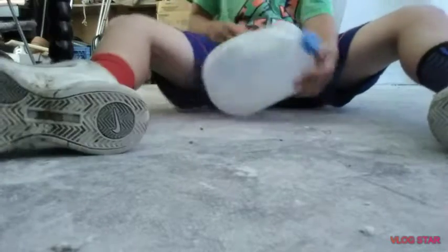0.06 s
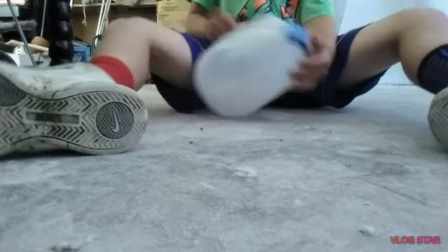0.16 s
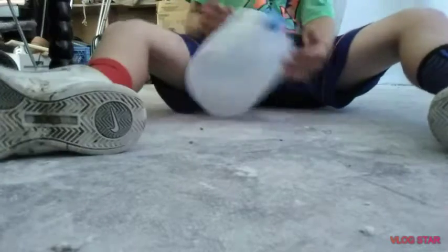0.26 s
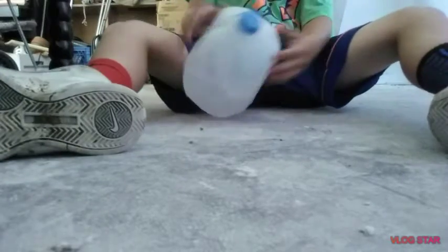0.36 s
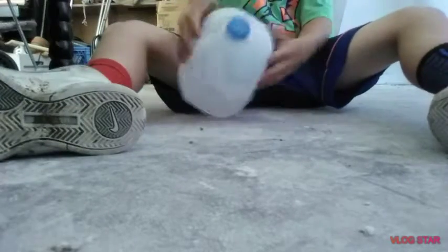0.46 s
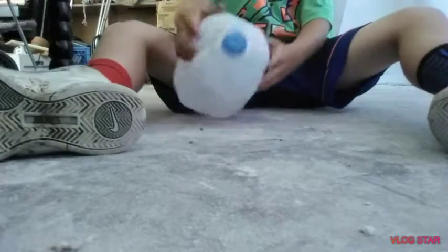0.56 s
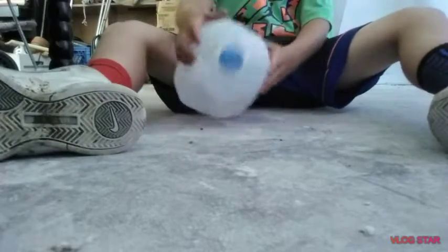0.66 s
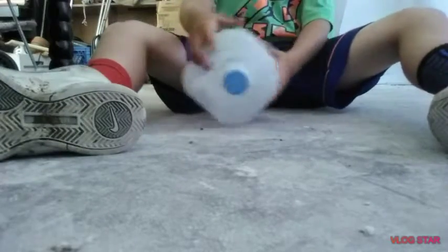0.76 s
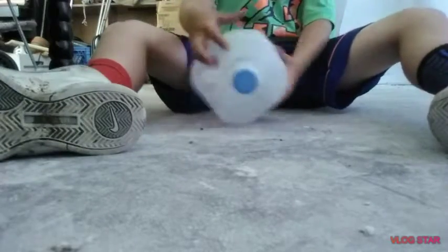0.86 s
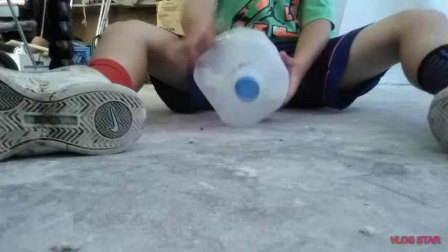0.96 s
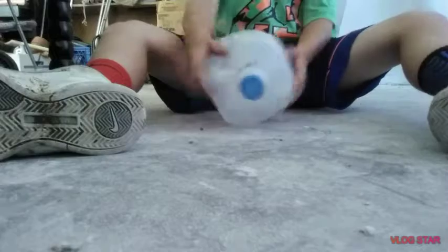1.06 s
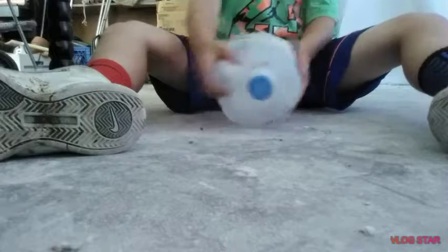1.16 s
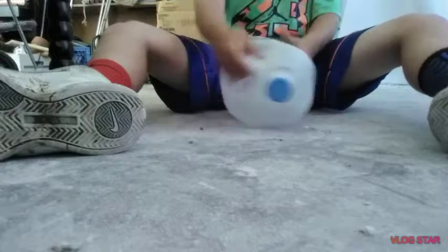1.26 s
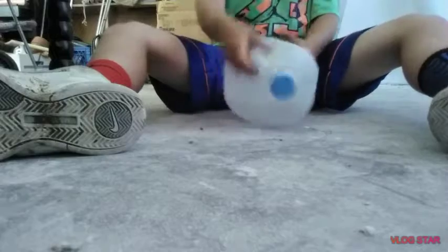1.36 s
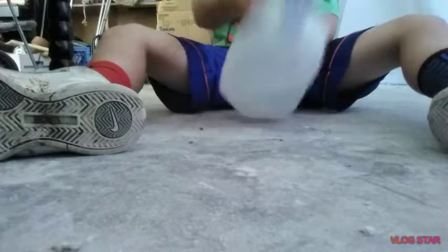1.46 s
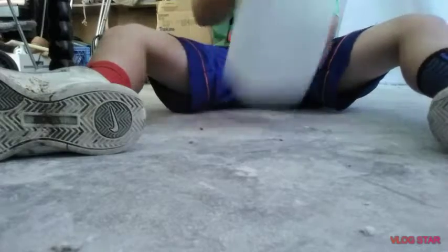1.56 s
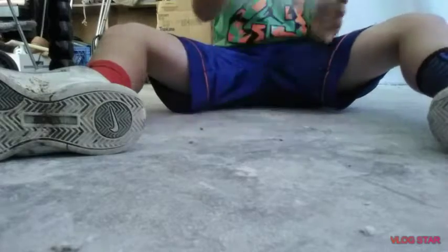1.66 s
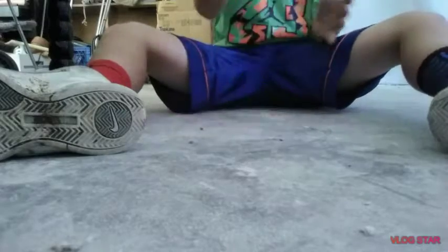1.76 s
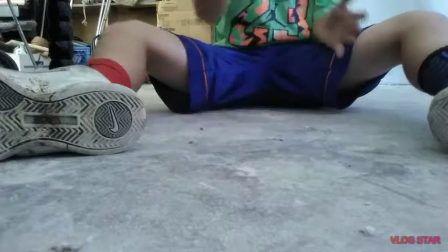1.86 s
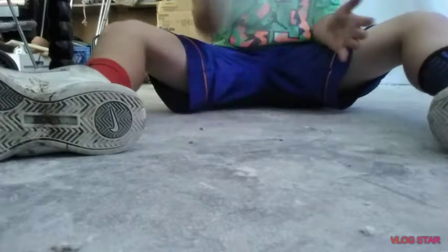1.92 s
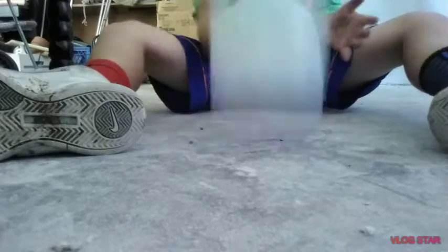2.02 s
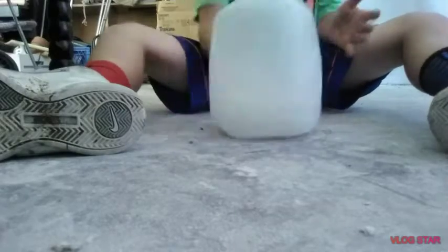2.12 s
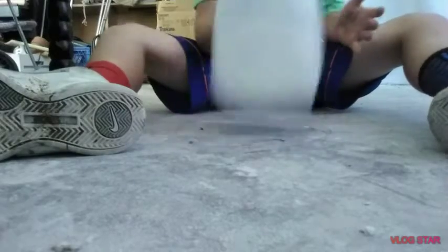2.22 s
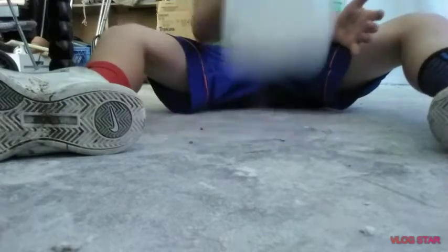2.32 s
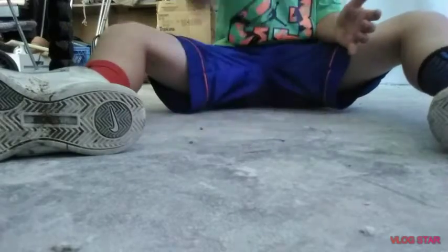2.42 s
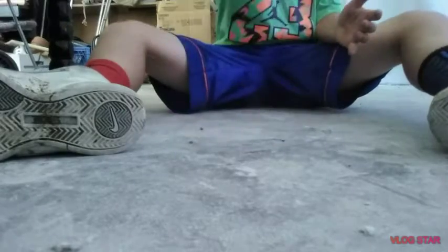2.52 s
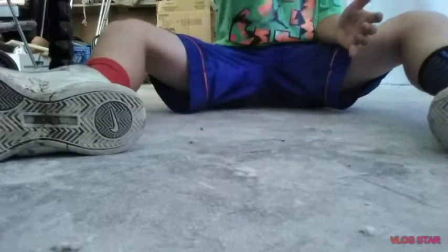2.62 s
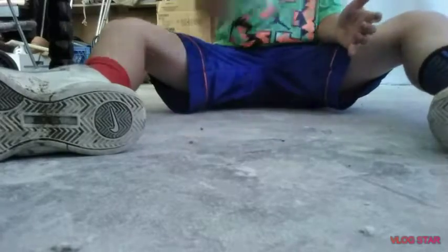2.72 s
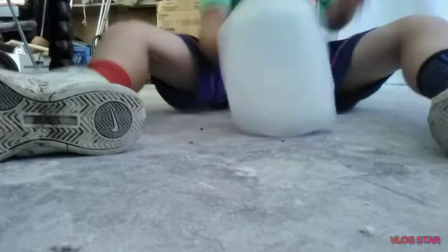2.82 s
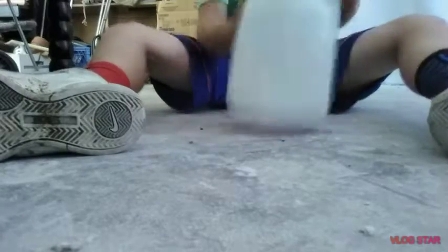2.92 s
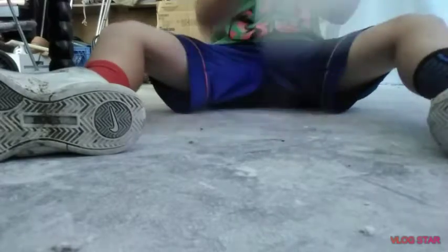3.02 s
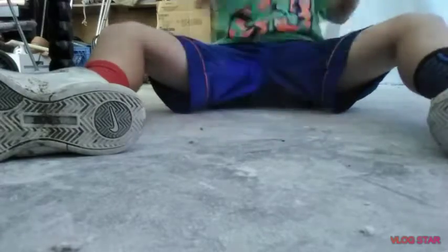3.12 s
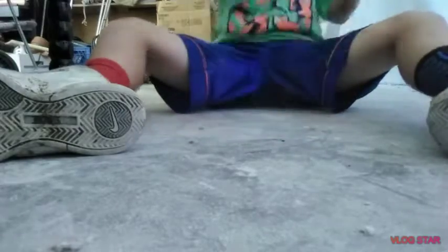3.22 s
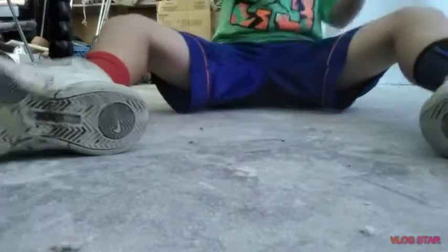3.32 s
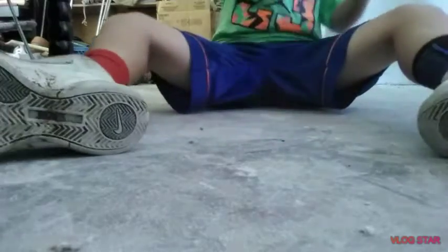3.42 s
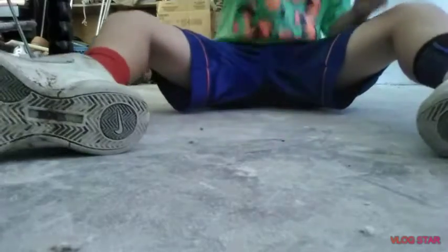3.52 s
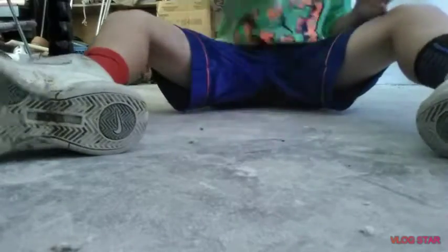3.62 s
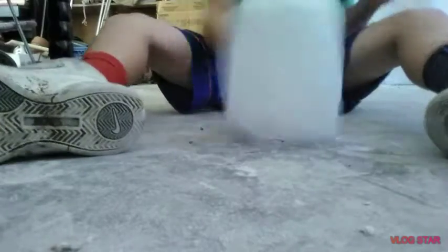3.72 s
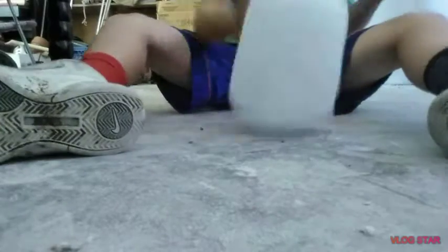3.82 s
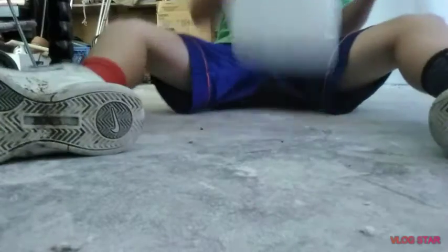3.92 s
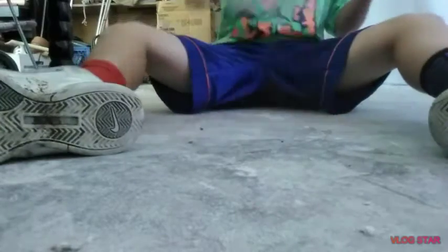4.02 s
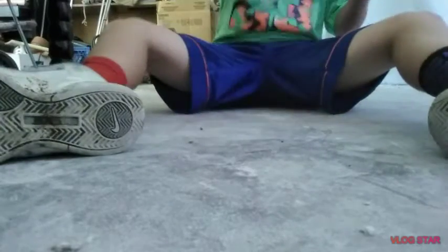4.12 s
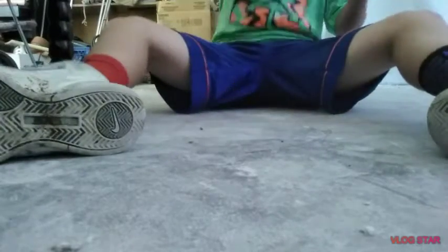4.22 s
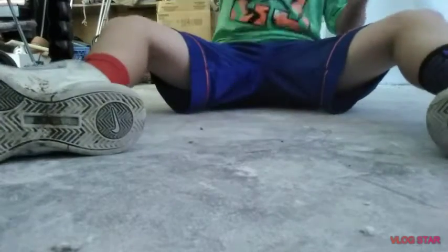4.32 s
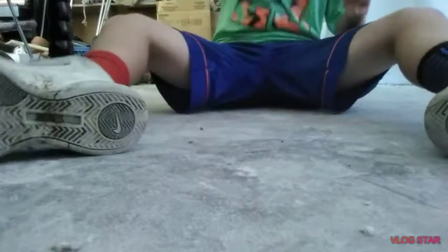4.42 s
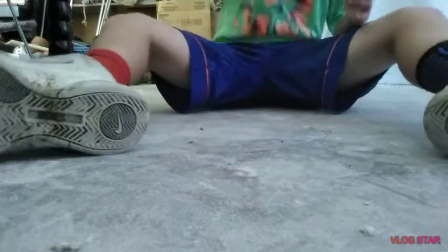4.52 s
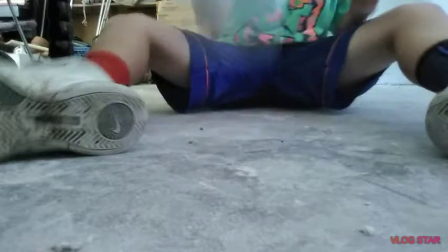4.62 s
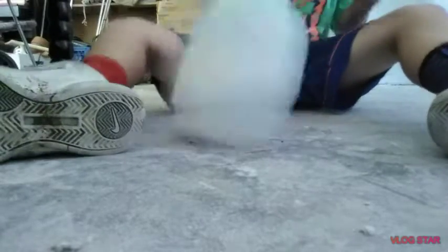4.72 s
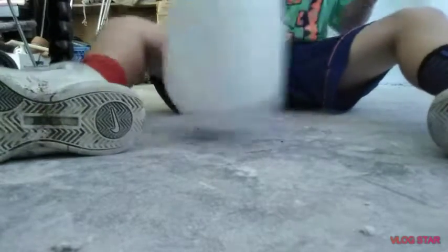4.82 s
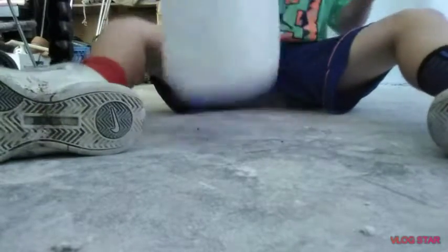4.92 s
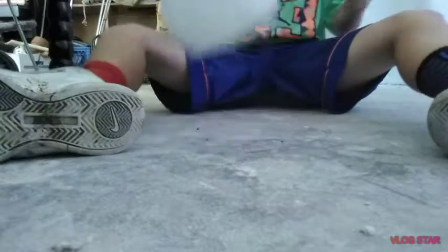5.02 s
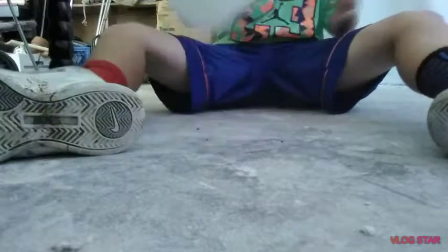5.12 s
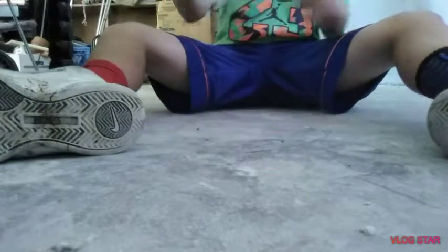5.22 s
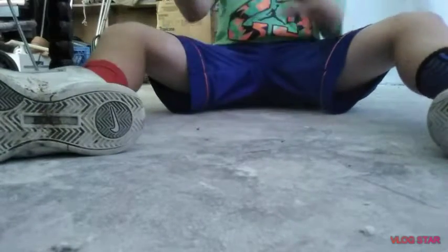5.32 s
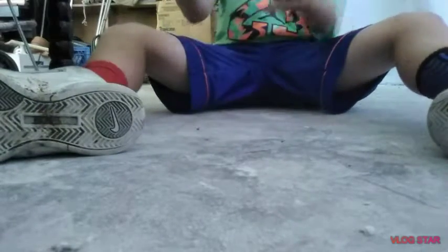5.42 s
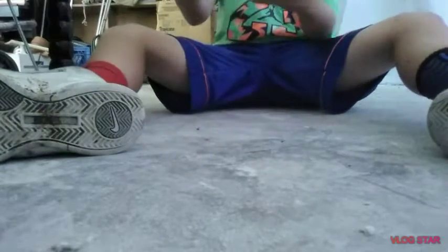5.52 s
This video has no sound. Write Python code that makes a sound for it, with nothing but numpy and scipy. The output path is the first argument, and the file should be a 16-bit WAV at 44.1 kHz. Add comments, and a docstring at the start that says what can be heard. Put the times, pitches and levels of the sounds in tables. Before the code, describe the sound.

A plastic jug with a little water is handled quietly, then smacks hard onto concrete four times, ringing hollow in a garage.

```python
"""On a concrete garage floor, close microphone: a plastic jug with a little water in it is turned in the
hands, then swung down four times. Each landing cracks (noise bursts), rings jug and garage (decaying sines)
and sets the base booming; the garage answers with fading noise and the close microphone overloads. Water
swishes as grainy noise and plops as rising sines, and like sounds lead softly into some landings;
skin brushes the plastic over a faint electric hum."""
import sys
import numpy as np
from scipy import signal
from scipy.fft import rfft, irfft, next_fast_len
from scipy.io import wavfile
from scipy.ndimage import uniform_filter1d

SR = 44100
rng = np.random.default_rng(int(sys.argv[2]) if len(sys.argv) > 2 else 0)


def master_out(mix):
    """Clip the mix to full scale and print it as 16-bit PCM to the path in sys.argv[1]."""
    frames = np.transpose(np.atleast_2d(mix))
    ceiling = np.clip(frames, -1, 1)
    pcm = np.round(ceiling * 32767).astype(np.int16)
    wavfile.write(sys.argv[1], SR, pcm)


N = 245637  # samples

# Levels are relative within each layer; spectra are relative density, brought to rms 1 by noise().
# Jug landings: t/s, smack level/dB, treble tilt/dB, ringing level/dB, ringing tilt/(dB per octave),
# boom level/dB, delay until the jug lifts/s, edge f/Hz, edge level/dB, knock f/Hz, knock level/dB,
# delay until the water lands/s, water level/dB
JUG_LANDINGS = [(2.078, -2.5, 0, -8, 1, -21.5, .155, 743, -11, 349.3, -12.5, .066, -19.5),
                (2.835, -3.5, -3, -5.5, 1.5, -13.5, .16, 735, -7.5, 402.2, -16.5, .075, -16.5),
                (3.7294, 2, -1.5, -3, -0.5, -7.5, 0.16, 559, -9, 501, -14, .075, -25.5),
                (4.741, -1.5, -4.5, -2, 0, -20, 0.14, 431, -11, 312.4, -11.5, 0.066, -11.5)]
# Ringing modes of the jug and the garage: f/Hz, level/dB, t60/s (before any damping by the hand)
RINGING_MODES = [(97.6, -14.5, .3), (132.6, -18.5, 0.23), (196, -27, 0.41), (233.6, -17, 0.21),
                 (282.7, -16, 0.27), (333.3, -23, 0.31), (401.8, -22.5, 0.19), (484.3, -16.5, 0.4),
                 (597.4, -23, 0.45), (617, -20, 0.45), (743.3, -22, 0.48), (832, -24, 0.11),
                 (1014, -24.5, 0.51), (1237, -26, 0.08), (1265, -25, 0.43), (1364, -21, 0.42),
                 (1467, -21, 0.32), (1561, -25.5, 0.47), (1815, -25, 0.53), (2080, -30.5, 0.33),
                 (2148, -34, 0.67)]
# Colour of the crack and of its echo, before the treble tilt: f/Hz, level/dB
SMACK_COLOUR = [(60, -15.5), (200, -4.5), (400, 6), (750, 4), (1100, -1.5), (1800, 1), (3200, -2),
                (5000, -2), (7400, 0.5), (8600, -9.5), (10000, -19.5), (15000, -42)]
# Push of air under the base: f/Hz, level/dB
THUD_COLOUR = [(20, -16.5), (42, -4.5), (65, 0.5), (140, -4.5), (260, -26), (600, -70)]
# Decay of the garage: f/Hz, t60/s
GARAGE_DECAY = [(60, 0.22), (200, 0.16), (450, 0.35), (1100, 0.44), (2500, 0.47), (7500, 0.44),
                (14000, 0.6)]
# Water sliding along the walls when the jug is swung or tipped: t/s, level/dB at t, swell length/s
WATER_SWISHES = [(1.115, -64, 0.11), (2.036, -45.5, 0.035), (2.775, -41, 0.084), (3.586, -48.5, .13),
                 (3.998, -51, 0.071), (4.5, -55.5, 0.25)]
# Colour of the tiny splashes: f/Hz, level/dB
SPRAY_COLOUR = [(240, -32.5), (400, -12.5), (502, 0.5), (640, -5.5), (1010, -5), (1250, -9), (2220, -3.5),
                (3770, -5.5), (4260, -6), (6710, -1.5), (7580, -2.5), (15000, -35)]
# Water plops; the rows at 2.066, 3.717 and 4.729 s are short soft low-mid lead-ins just before a landing:
# t/s, sine level/dB, starting f/Hz
PLOPS_AND_LEAD_INS = [(.005, -38, 423), (.479, -48, 760), (.548, -43.5, 660), (1.305, -48.5, 1000),
                      (1.415, -43.5, 667), (1.438, -36, 680), (1.461, -40, 712), (1.646, -30, 919),
                      (2.066, -33.5, 728), (2.702, -44.5, 800), (3.68, -34, 480), (3.717, -30.5, 780),
                      (4.041, -46, 873), (4.654, -42.5, 840), (4.729, -22, 450), (4.977, -46, 516)]
# Fingers brushing the plastic, and at 0.787 s a short grainy burst near 1 kHz: t/s, level/dB, stroke length/s,
# centre f/Hz, skin hiss level/dB
FINGER_BRUSHES = [(.003, -49.5, 0.038, 2000, 1), (.546, -49.5, 0.019, 1940, 1),
                  (.772, -54, 0.056, 3300, -9), (0.787, -53, 0.026, 1060, -18),
                  (1.019, -59, 0.033, 2430, -18), (1.437, -54.5, 0.043, 1800, -1),
                  (1.578, -58.5, 0.059, 1500, -18), (2.70, -52.5, .022, 1840, -19.5),
                  (3.579, -48, .06, 2220, -10.5), (4.668, -40, .014, 2300, -10),
                  (5.11, -58, 0.042, 3900, -16.5)]
# Hiss of skin on plastic: f/Hz, level/dB
SKIN_COLOUR = [(400, -45), (3200, -8.5), (6400, -3), (7400, -4), (9600, -19), (15000, -38)]
# The jug jolts in the hand on the downswing: t/s, level/dB
HAND_JOLTS = [(2.005, -33.5), (4.668, -23)]
# Partials of the electric hum, before the common trim: f/Hz, rms level/dB
HUM_PARTIALS = [(59.2, -62.5), (96.5, -63.5), (118.6, -61.5), (243.4, -60), (343, -72), (400, -77),
                (487, -80)]
# Colour of the still air: f/Hz, level/dB
AIR_COLOUR = [(22, -34.5), (45, -8.5), (120, -8.5), (200, -10), (300, -14), (450, -16), (900, -23),
              (1400, -22.5), (2300, -24), (3400, -27.5), (4600, -24), (7500, -20.5), (10000, -32),
              (15000, -49.5)]

BOOM_HZ = 73  # the base on its cushion of air
# the water breaks loose, gathers speed, settles
SWISH_RISE_DB_PER_S, SWISH_SWELL_DB_PER_S, SWISH_FALL_DB_PER_S = 650, 58.5, 191.5
WHINE_HZ, WHINE_DB = 4550, -75.5  # a thin whine above the hum
TOP_HZ = 15600  # upper band limit of the recorder


def amp(db):
    """Decibels to amplitude."""
    return 10 ** (np.asarray(db) / 20)


def unit(x):
    """Scale to rms 1."""
    return x / np.sqrt(np.mean(x ** 2) + 1e-20)


def along(points, hz):
    """Read (f/Hz, value) points on a log frequency axis."""
    f, value = np.transpose(points)
    return np.interp(np.log(hz + 1), np.log(f + 1), value)


def filtered(x, response):
    """Multiply the spectrum of x by a response of frequency."""
    size = next_fast_len(len(x) + 8192)
    hz = np.fft.rfftfreq(size, 1 / SR)
    return irfft(rfft(x, size) * response(hz), size)[:len(x)]


def noise(spectrum, size):
    """Coloured noise of rms 1."""
    return unit(filtered(rng.standard_normal(size), lambda hz: amp(along(spectrum, hz))))


def flutter(size, width):
    """Slow random wander of rms 1: white noise averaged over width samples."""
    return unit(uniform_filter1d(rng.standard_normal(size), size=width))


def add(track, s, sound):
    """Mix a sound in at time s."""
    part = track[max(round(s * SR), 0):][:len(sound)]
    part += sound[:len(part)]


def landings():
    """Smack, hollow pock of the first edge, ringing, panel knock and boom; the water comes down just after."""
    out, t = np.zeros(N), np.arange(SR) / SR
    for (s, smack_db, treble_db, ringing_db, tilt_db, boom_db, lift, edge_hz, edge_db,
         knock_hz, knock_db, water_lag, water_db) in JUG_LANDINGS:
        hit = amp(smack_db) * smack(t, treble_db, crack_db=-6.0, crack_t60=0.013,
                                    echo_db=-10.5, echo_rise=0.023)
        edge = amp(edge_db) * ring(t, edge_hz, 0.075, rough=24, rise=0.0032)
        ringing = amp(ringing_db) * struck_modes(t, tilt_db)
        knock = amp(knock_db) * ring(t, knock_hz, 0.3, rough=14, rise=0.014)
        boom = amp(boom_db) * ring(t, BOOM_HZ, 0.46, rough=1.8, rise=0.022)
        thud = amp(-21.5) * noise(THUD_COLOUR, len(t)) * amp(-60 * t / 0.36)
        choke = .5 - .5 * np.tanh((t - lift) / 0.011)  # the base stops booming once it leaves the floor
        add(out, s, hit + edge + ringing + knock + (boom + thud) * choke)
        water = amp(water_db) * ring(t, knock_hz, .16, rough=26, rise=0.0064)
        add(out, s + water_lag, water)
    return out


def smack(t, treble_db, crack_db, crack_t60, echo_db, echo_rise):
    """One edge cracks on the concrete, the rest of the base slaps after it, and the echo builds up."""
    tilt = [(1800, 0), (4500, 1)]  # treble setting takes hold between these f/Hz
    colour = [(hz, db + treble_db * along(tilt, hz)) for hz, db in SMACK_COLOUR]
    contact = amp(-60 * t / crack_t60)
    for delay, db in [(.003, 5.5), (.011, -4.5)]:  # later slaps: delay/s, level/dB
        contact = contact + (t > delay) * amp(db - 60 * np.abs(t - delay) / crack_t60)
    crack = amp(crack_db) * contact * noise(colour, len(t))
    rattle = amp(0.95 * flutter(len(t), width=300))  # the thin walls flutter
    echo = dying(noise(colour, len(t))) * rattle * (1 - np.exp(-t / echo_rise))
    return crack + amp(echo_db) * echo


def struck_modes(t, tilt_db):
    """Jug and garage ring at new strengths on every blow; random phase drift broadens the higher modes most."""
    out = np.zeros(len(t))
    for hz, db, t60 in RINGING_MODES:
        mode_db = db + tilt_db * np.log2(hz / 500) + rng.normal(0, 2)
        strength = rng.choice([-1, 1]) * amp(mode_db)
        out += strength * ring(t, hz, t60, rough=3.5 + hz / 130, rise=.009)
    return out


def ring(t, hz, t60, rough, rise):
    """One decaying sine with a random phase drift."""
    drift = np.cumsum(rng.standard_normal(len(t))) / np.sqrt(SR)
    return np.sin(2 * np.pi * hz * t + rough * drift) * amp(-60 * t / t60) * (1 - np.exp(-t / rise))


def dying(x):
    """Each frequency of x fades at the pace of the garage."""
    hz, t, z = signal.stft(x, SR, nperseg=256)
    fade = amp(-60 * t / along(GARAGE_DECAY, hz)[:, None])
    return signal.istft(z * fade, SR, nperseg=256)[1][:len(x)]


def in_garage(x, wet_db):
    """A sound with its diffuse echo off the garage."""
    tail = dying(rng.standard_normal(SR))
    echo = signal.fftconvolve(x, tail / np.linalg.norm(tail))[:len(x)]
    return x + amp(wet_db) * echo


def swish(grain_db, wet_db):
    """A film of water rushes along the inside in tiny splashes: starts quickly, swells, then settles."""
    level = np.zeros(N)
    for s, db, length in WATER_SWISHES:
        t = np.arange(N) / SR - s
        rise = SWISH_RISE_DB_PER_S * np.minimum(t, 0)
        swell = SWISH_SWELL_DB_PER_S * np.clip(t, 0, length)
        fall = SWISH_FALL_DB_PER_S * np.maximum(t - length, 0)
        level += amp(db + rise + swell - fall)
    splashes = amp(grain_db * flutter(N, width=130))
    return level * unit(in_garage(splashes * noise(SPRAY_COLOUR, N), wet_db))


def plops_and_lead_ins(t60, rise, splash_db, splash_t60, wet_db):
    """A brief rising sine under slightly higher noise: trapped air and closing water, or a soft lead-in."""
    out, t = np.zeros(N), np.arange(SR // 2) / SR
    for s, db, hz in PLOPS_AND_LEAD_INS:
        tone = amp(-60 * t / t60) * np.sin(2 * np.pi * hz * t * (1 + rise * t))
        splash = unit(filtered(rng.standard_normal(len(t)),
                               lambda f: np.exp(-(np.log2((f + 1) / (1.2 * hz)) / .55) ** 2)))
        splash = amp(splash_db - 60 * t / splash_t60) * splash
        sound = (tone + splash) * (1 - np.exp(-t / .0012))
        add(out, s, amp(db) * in_garage(sound, wet_db))
    return out


def brushes(wet_db):
    """Short grainy rubs of skin on plastic, and one grainy burst near 1 kHz; the longer ones swell more slowly."""
    out, t = np.zeros(N), np.arange(SR // 2) / SR
    for s, db, length, hz, hiss_db in FINGER_BRUSHES:
        rub = noise([(hz / 16, -45), (hz / 2, -11), (hz, 0), (hz * 1.15, -3),
                     (hz * 1.5, -19), (hz * 5, -45)], len(t))
        hiss = amp(hiss_db) * noise(SKIN_COLOUR, len(t))
        grains = unit(amp(4 * flutter(len(t), width=130)))
        stroke = np.exp(-(t / length) ** 2) * (1 - np.exp(-t / (0.35 * length)))
        add(out, s, amp(db) * (rub + hiss) * grains * stroke)
    return in_garage(out, wet_db)


def jolts(centre_hz, t60):
    """The soft hand rings mainly the low modes, and damps them."""
    out, t = np.zeros(N), np.arange(SR // 2) / SR
    for s, db in HAND_JOLTS:
        add(out, s, amp(db) * struck_modes(t, tilt_db=0) * amp(-60 * t / t60))
    band = [(centre_hz / 2, -12), (centre_hz, 0), (centre_hz * 2, -12), (centre_hz * 5, -40)]
    return filtered(out, lambda hz: amp(along(band, hz)))


def background(hum_db, air_db):
    """A faint electric hum of steady sines and a narrow noise whine in still air."""
    t = np.arange(N) / SR
    hum = sum(np.sqrt(2) * amp(db) * np.sin(2 * np.pi * (hz * t + rng.random()))
              for hz, db in HUM_PARTIALS)
    whine = unit(filtered(rng.standard_normal(N), lambda hz: np.exp(-((hz - WHINE_HZ) / 70) ** 2)))
    return amp(hum_db) * hum + amp(air_db) * noise(AIR_COLOUR, N) + amp(WHINE_DB) * whine


def scene():
    """Landings, water and hands over the still garage."""
    swishes = swish(grain_db=2.5, wet_db=-5.0)
    plops = plops_and_lead_ins(t60=0.023, rise=3.4, splash_db=-13.0, splash_t60=0.21, wet_db=-15.0)
    hands = brushes(wet_db=-0.5) + jolts(centre_hz=230, t60=0.2)
    return (landings() + swishes + plops + hands + background(hum_db=-2.5, air_db=-60))[None]


def suppress(x, threshold_db, depth_db):
    """The recorder turns the treble down whenever it is faint."""
    treble = filtered(x, lambda hz: 1 - 1 / (1 + (hz / 1500) ** 2))
    power = np.abs(uniform_filter1d(treble ** 2, size=700))
    gain = amp(depth_db / (1 + power / amp(threshold_db) ** 2))
    return x + treble * (gain - 1)


def overload(x, top, hardness):
    """The close microphone flattens peaks smoothly towards the level top."""
    return x / (1 + np.abs(x / top) ** hardness) ** (1 / hardness)


def record(dry):
    """Noise suppression, overload on the landings, then the band limit."""
    x = suppress(dry[0], threshold_db=-59.5, depth_db=-17.5)
    x = overload(x, top=.33, hardness=6)
    return filtered(x, lambda hz: 1 / (1 + (hz / TOP_HZ) ** 120))[None]


dry = scene()
out = record(dry)
master_out(out)
```